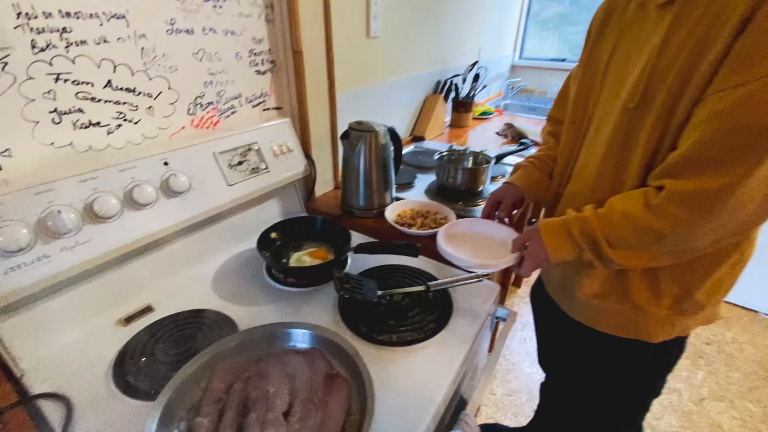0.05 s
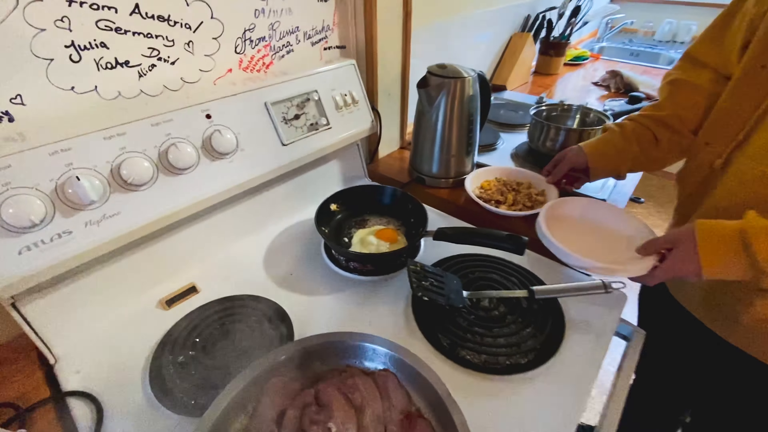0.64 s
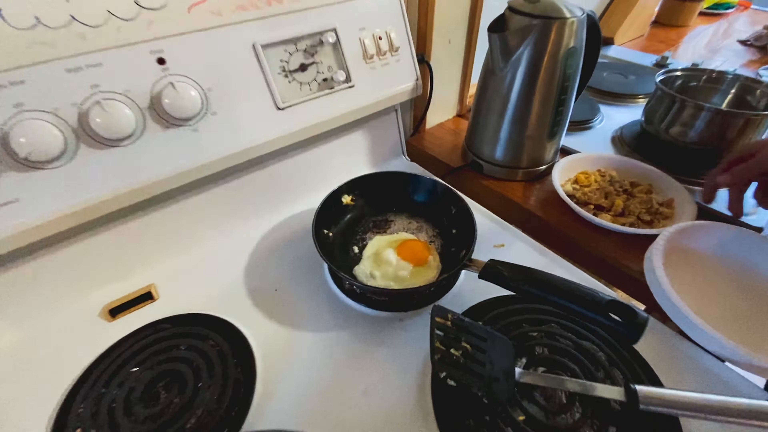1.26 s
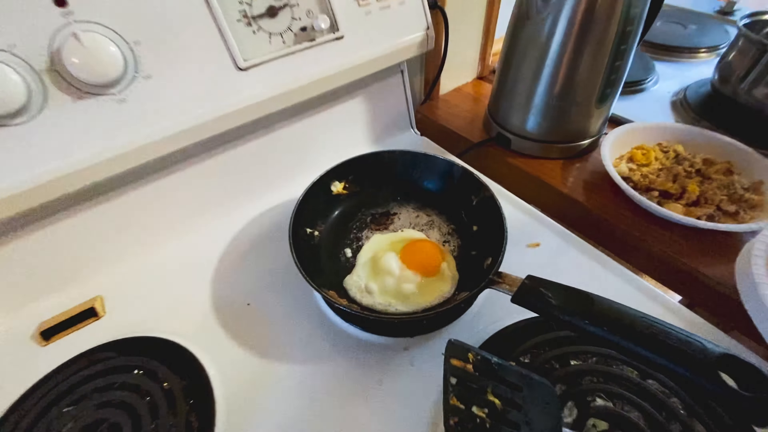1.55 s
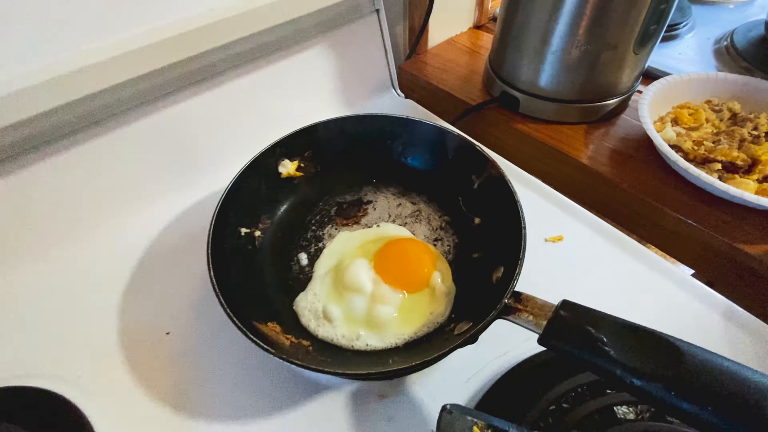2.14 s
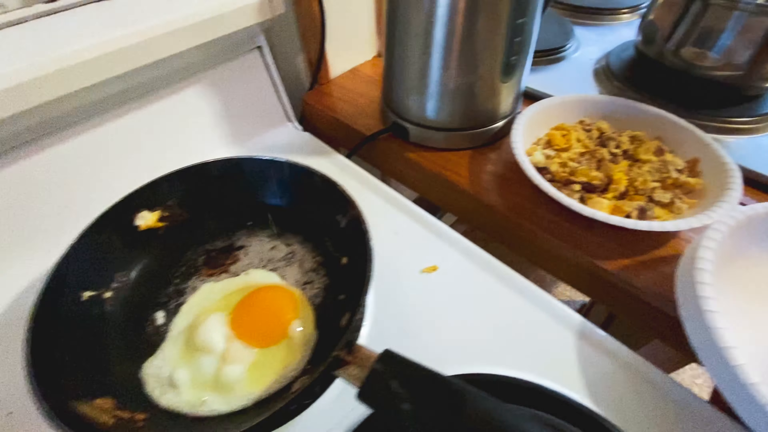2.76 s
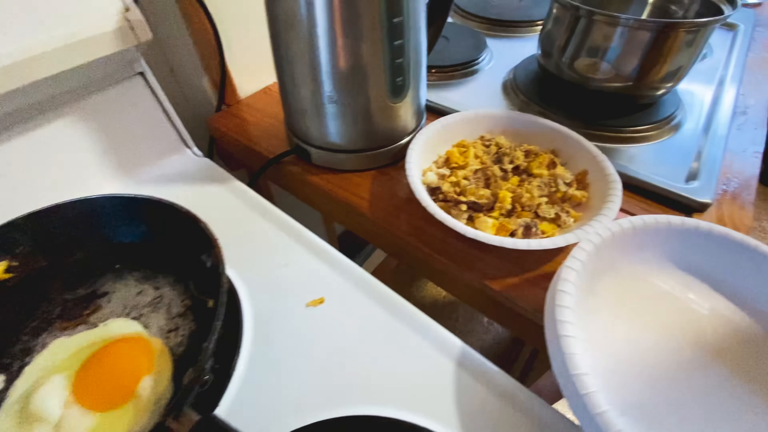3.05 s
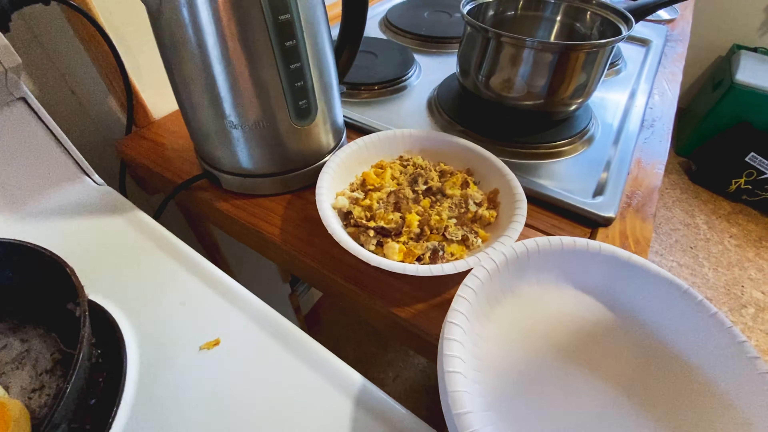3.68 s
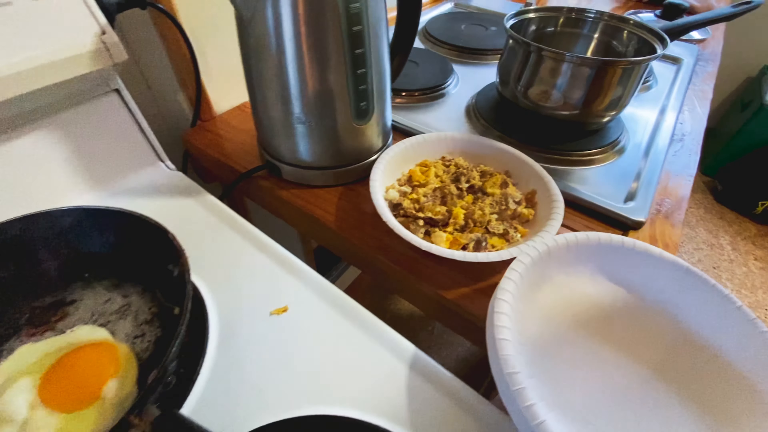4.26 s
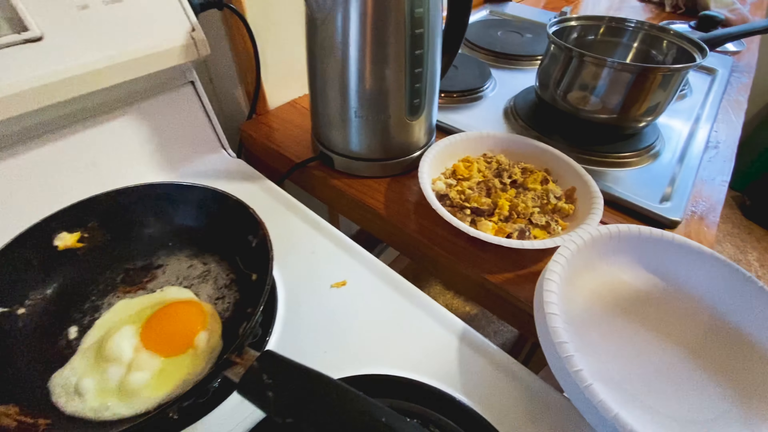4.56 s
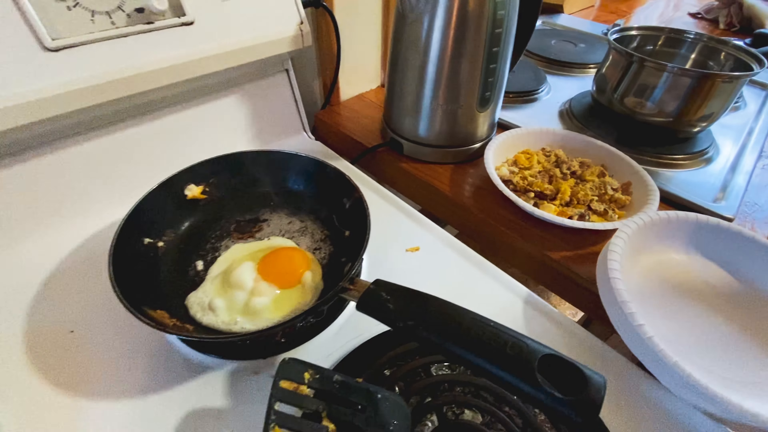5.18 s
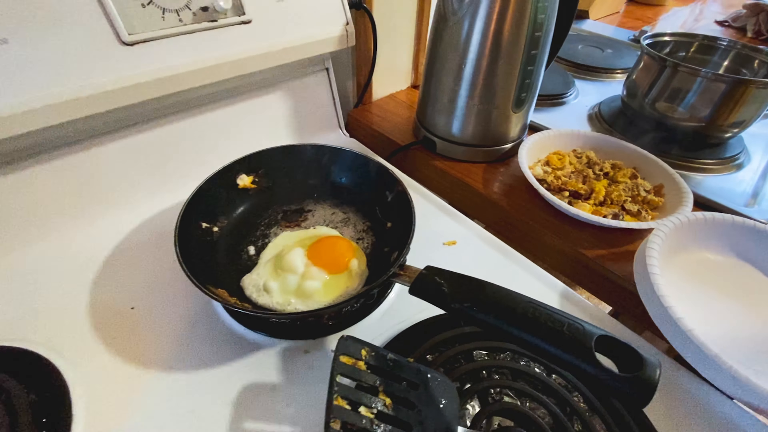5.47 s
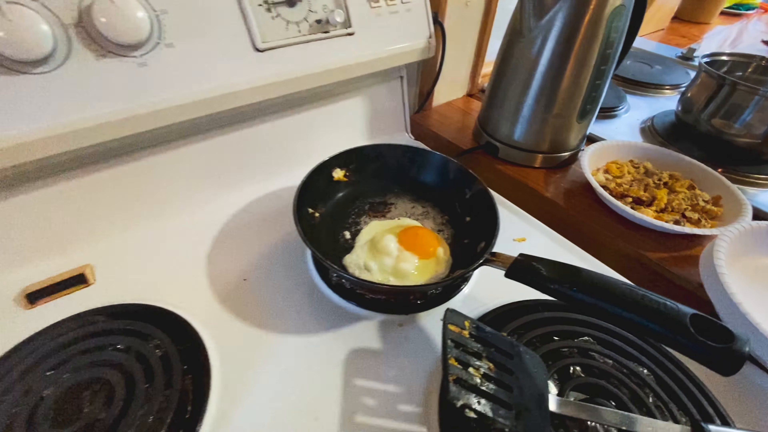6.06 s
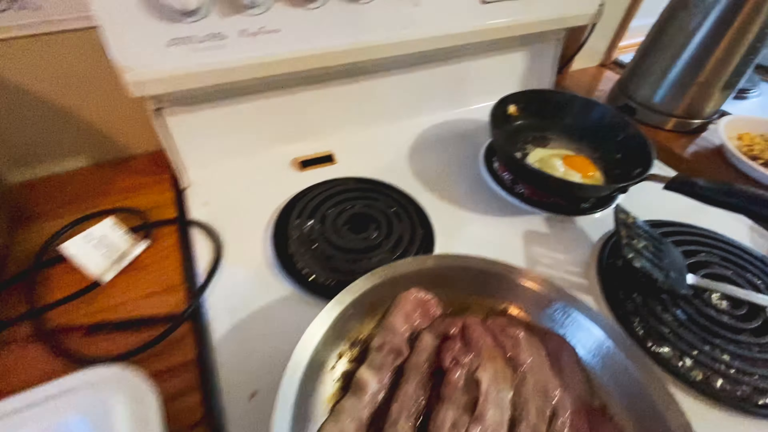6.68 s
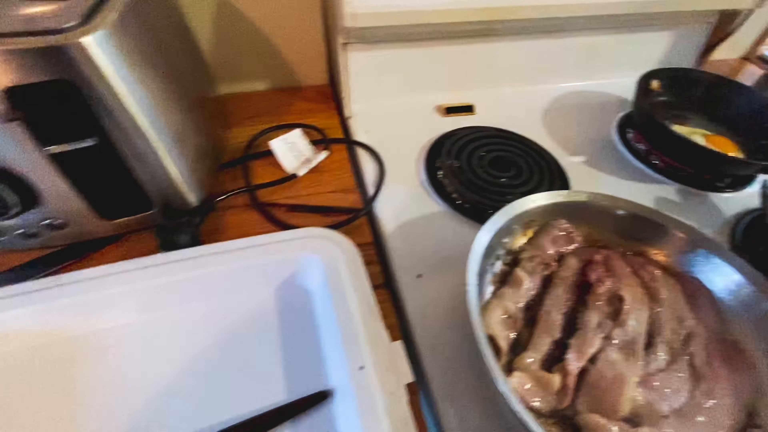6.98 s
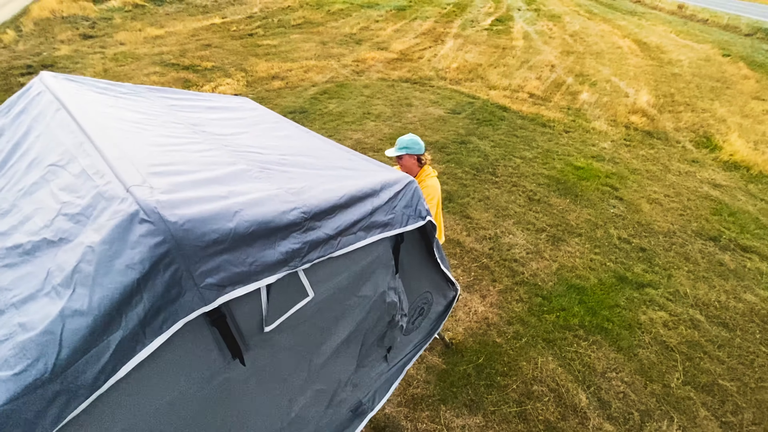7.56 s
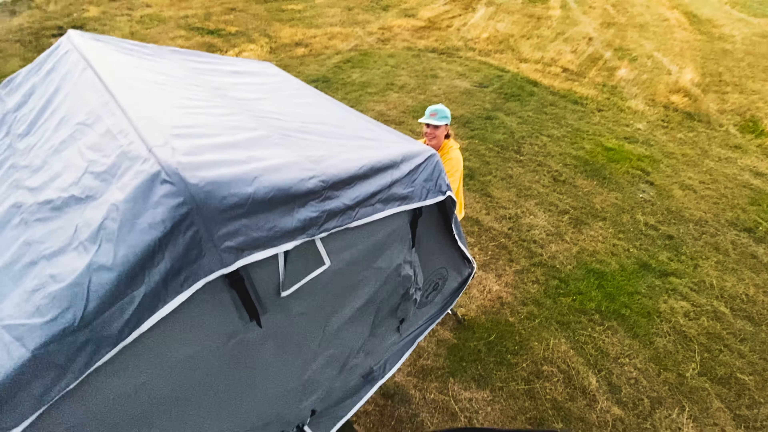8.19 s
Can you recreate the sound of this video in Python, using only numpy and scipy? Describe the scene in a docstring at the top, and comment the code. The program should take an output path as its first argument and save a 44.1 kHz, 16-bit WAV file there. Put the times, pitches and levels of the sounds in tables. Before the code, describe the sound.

Hot fat sizzles and crackles near the microphone in a kitchen as an egg and meat fry. Louder pops and short fizzes break through, with occasional light knocks on the stove and a low hum underneath. Near the end the frying stops abruptly, giving way to quiet open air at a campsite: a light breeze and distant rush, faintly stirring tent cloth, a small metal clink and a few soft bumps.

```python
"""Frying egg, then a campsite.

An egg and a pan of meat fry on an electric stove: steam bubbles burst in the fat, with louder pops,
spurts, passing fizzes and light knocks over a low beating hum. The colour follows where the listener
faces. Cut to a quiet campsite: a breeze, a far rush, a clink, tent cloth rustling and bumping."""
import sys
import numpy as np
from scipy import signal
from scipy.fft import rfft, irfft, next_fast_len
from scipy.io import wavfile
from scipy.ndimage import uniform_filter1d, map_coordinates

SR = 44100
rng = np.random.default_rng(int(sys.argv[2]) if len(sys.argv) > 2 else 0)


def waveform_to_disk(signal):
    """Save audio, clipped to [-1, 1], as 16-bit WAV at the path in sys.argv[1]."""
    frames = np.transpose(np.atleast_2d(signal))
    scaled = np.clip(frames, -1, 1) * 32767
    samples = np.round(scaled).astype(np.int16)
    wavfile.write(sys.argv[1], SR, samples)


N = 367234
T = np.arange(N) / SR
CUT_S = 7.196
EGG_LEAD_MS, MEAT_LEAD_MS = .26, -.186   # left ear's lead: egg left, meat right

# Still kitchen air. Each row: frequency in Hz, relative density in dB.
KITCHEN_AIR = [(25, -36), (50, -12), (130, 0.5), (250, -25.5), (600, -17.5), (2000, -24.5)]
# Breeze and far rush. Each row: frequency in Hz, relative density in dB.
BREEZE_SPECTRUM = [(18, -41), (30, -22), (81, -4), (143, -16.5), (288, -16), (472, -21), (597, -11),
                   (662, -12), (815, -7.5), (905, -14), (978, -9.5), (1270, -23.5), (1970, -29.5),
                   (4310, -58), (8000, -59), (15000, -62.5)]
# Breeze strength. Each row: time in seconds, relative level in dB.
BREEZE_LEVEL = [(7.25, -49.5), (7.876, -49), (8.327, -45.5)]
# Breeze width. Each row: frequency in Hz, left-right correlation.
BREEZE_LIKENESS = [(150, 0.96), (400, 0.67), (1000, 0.56), (6000, 0.23)]
# Stirring tent cloth. Each row: time in seconds, level in dB.
RUSTLE_LEVEL = [(7.25, -74), (7.55, -77), (7.68, -71), (7.75, -63.5), (7.8, -70), (7.89, -83),
                (7.97, -67.5), (8.03, -75), (8.2, -64), (8.27, -79.5)]
# Motor and mains tones. Each row: frequency in Hz, rms in dB before nearness.
HUM_TONES = [(48.88, -69), (97.74, -56), (99.96, -58), (195.5, -74), (199.9, -75)]
# Nearness of the hum. Each row: time in seconds, gain in dB.
HUM_NEARNESS = [(0, -13.5), (.7, -5), (1.5, -2), (3.5, -0.5), (5.5, -1.5), (6.3, -2.5), (6.7, -9.5),
                (7.2, -12.5)]
# Soft low rumbles. Each row: centre in seconds, half-width in seconds, level in dB, pitch in Hz.
RUMBLES = [(0.786, 0.018, -49.5, 180), (0.842, 0.03, -45.5, 85), (6.101, 0.24, -60.5, 420)]
# Knocks of handling, spatula and plate. Each row: start in seconds, thud in dB, its nominal pitch in Hz, clack
# in dB, its pitch in Hz, rattle in dB.
KITCHEN_KNOCKS = [(.772, -31, 179, -25.5, 1500, -36), (2.301, -25.5, 259, -37.5, 1530, -23.5),
                  (2.768, -36.5, 268, -11.5, 1050, -36.5), (2.7695, -17, 215, -29, 420, -44.5),
                  (3.4, -32, 330, -29, 790, -25.5), (3.4, -45, 300, -19.5, 2370, -34),
                  (4.441, -37.5, 218, -37, 680, -29.5), (4.8686, -22.5, 352, -19, 680, -23),
                  (4.8686, -52.5, 300, -8, 2300, -14), (4.8728, -30.5, 300, -9.5, 2560, -32),
                  (4.878, -30, 170, -10.5, 2470, -22), (7.04, -33.5, 362, -25, 1110, -27)]
# Tent cloth bumps and snaps. Each row: as for the kitchen knocks.
TENT_BUMPS = [(8.074, -59, 150, -56, 2000, -42), (8.092, -51, 181, -27, 750, -30.5),
              (8.0955, -21.5, 120, -48, 714, -36), (8.116, -35, 130, -23.5, 850, -23.5),
              (8.116, -57, 300, -37, 8500, -22), (8.116, -60, 301, -22.5, 1930, -41),
              (8.212, -29, 168, -58, 750, -58)]
# Listener's heading. Each row: time in seconds, aim (-1 meat, 0 egg, 1 the plate past it).
AIM = [(0, -0.61), (.7, -0.27), (1.2, -0.14), (2.65, 0.78), (2.95, 0.99), (4.3, 1), (5.2, 0.85),
       (6.3, -0.037), (6.8, -0.916)]
# Frying colour per heading. Each row: frequency in Hz, left gain in dB, right gain in dB.
FACING_MEAT = [(230, -47, -34.5), (442, -24, -21), (803, -17, -9), (1240, -11.5, -5), (1600, -8, -12.5),
               (2076, -13, -8), (2900, -3.5, -10), (4850, -2, -1.5), (5940, -2.5, -9), (7300, -4, -6),
               (8830, -17.5, -6.5), (11300, -5.5, -6), (13300, -15, -15), (14800, -10.5, -10.5)]
FACING_EGG = [(230, -25.5, -29.5), (472, -16.5, -21.5), (890, -1.5, -13), (1267, -3, -8.5), (1500, 2, -3),
              (1950, 1.5, -1), (3640, -3, -7.5), (5100, -4, -6), (6650, -0.5, -10.5), (8780, -7, -5),
              (11180, -7.5, -6), (13150, -11.5, -12), (14600, -11, -10.5)]
FACING_PLATE = [(232, -31, -36), (503, -21.5, -28.5), (640, -12.5, -17.5), (1320, -11, -17.5),
                (1620, -10, -9.5), (1900, -10.5, -13), (2860, -3.5, -8), (4200, -9.5, -13.5),
                (6170, -4, -16.5), (8360, -16, -10.5), (12420, -17.5, -19), (14000, -18.5, -18.5),
                (15500, -17.5, -18)]
# Sizzle scattered by the kitchen. Each row: frequency in Hz, level in dB re direct sound.
SCATTER = [(300, 6.5), (1000, -5), (2500, -4), (5000, -0.5), (9000, -1.5), (12000, -1)]
# How hard the fat fries. Each row: time in seconds, gain in dB.
VIGOUR = [(0, -3), (.2, -2), (.42, 0.5), (.85, 1), (1.25, 0), (1.55, 1), (2.1, 0.6), (2.6, 3), (3.7, 0.5),
          (5, 4.5), (5.75, 2), (6.45, 1.5), (6.8, 1), (7.19, -2)]
# Large, low bubbles. Each row: time in seconds, gain in dB.
LARGE_BUBBLES = [(0, -1), (.35, -2.5), (.6, 0), (.9, -1.5), (1.5, 1), (2.2, -1.5), (2.6, -2.5), (3.5, 3.5),
                 (4.5, -1.5), (5.1, -0.5), (6.0, -1), (6.6, 0), (7.1, 0)]
# The two pans. Each row: frequency in Hz, meat re egg in dB, lean of each to its side in dB.
PAN_BALANCE = [(1000, -9, 3), (1960, -8, 10.5), (3480, -6, 33.5), (6000, -13.5, 17), (9040, 2, 8.5),
               (12000, 2.5, 1.5)]
# The egg throws larger droplets, the meat finer. Each row: pitch in Hz, left ear's lead in ms.
DROPLET_LEAD = [(6500, EGG_LEAD_MS), (8500, MEAT_LEAD_MS)]
# Droplet side. Each row: pitch in Hz, left over right in dB.
DROPLET_SIDE = [(2200, 2), (3600, 21), (5500, 18), (7000, 1), (8000, -5), (12000, -1.5)]
# Steam leaks under the egg. Each row: centre in seconds, half-width in seconds, level in dB,
# pitch in Hz, bandwidth in octaves.
FIZZES = [(.42, .18, -29.5, 4730, .25), (0.796, .08, -31.5, 4520, .26), (1.774, 0.084, -26.5, 6100, 0.22),
          (2.494, 0.39, -32, 4900, 0.34)]
# Steam jets. Each row: start in seconds, half-length in seconds, level in dB, pitch in Hz,
# left over right in dB.
SPURTS = [(.624, .014, -25, 1550, 2), (0.758, 0.04, -24, 8080, -6), (0.941, 0.02, -25.5, 3880, 0),
          (1.184, .01, -26, 1550, 3.5), (1.52, 0.021, -35, 6770, 0), (3.383, 0.027, -27, 7030, 0),
          (4.437, 0.033, -28, 3670, 11), (5.042, 0.0023, -22, 5240, 5), (6.421, 0.0099, -18.5, 6830, 2),
          (6.425, .006, -20, 1900, 4), (7.12, .03, -29, 2700, -5)]
# Water popping in fat. Each row: start in seconds, level in dB, pitch in Hz, mist in dB re pop.
POPS = [(.062, -9, 4800, -16), (0.1485, -16, 6060, -3), (.202, -10, 5500, -18), (.2077, -10, 5800, -15),
        (0.225, -5, 5040, -21), (.3591, -7, 5340, -15), (0.395, -3, 5500, -16), (0.5024, -6, 11450, -7),
        (0.6695, -4, 5300, -24), (0.761, 3, 7490, -13), (0.7816, 4, 8600, -18), (0.882, -3, 12000, -11),
        (1.107, -7.5, 13000, -8), (1.162, -6.5, 4950, -14), (1.3413, -8, 4370, -19), (1.41, -9, 9200, -13),
        (1.4166, -9, 5540, -8), (1.527, -10, 6000, -6), (1.534, -4, 5670, -14), (1.5735, -3, 5600, -5.5),
        (2.1783, -8, 5840, -18), (2.3155, -9, 4960, -18), (2.3008, -11.5, 6000, -2.5),
        (2.4678, -13.5, 3180, -19), (2.612, -4.5, 5700, -16), (2.653, -7, 4840, -20),
        (2.744, -16, 3200, -20), (2.749, -0.5, 5700, -19), (2.7673, 0.5, 12600, -8.5),
        (2.9994, -13.5, 6870, -18), (3.2139, -15, 5300, -10), (3.2935, -17, 2800, -20),
        (3.8962, -12.5, 5870, -25), (4.4061, -6.5, 5500, -26), (4.44, -7, 2900, -22),
        (4.4426, -10, 5000, -16), (4.444, -13, 4140, -18), (4.4537, -17, 2900, -12),
        (4.7197, -13, 2580, -16.5), (5.0202, -0.5, 4100, -31), (5.0449, -4.5, 5360, -5.5),
        (5.135, -8, 6800, -8), (5.2007, -6.5, 5730, -20), (5.294, -8, 3720, -27), (5.4195, -7, 3560, -17.5),
        (5.5142, -9, 13500, -7), (5.684, -4, 5080, -20), (5.685, -9, 2250, -18), (5.72, -5, 5500, -17),
        (5.812, -8.5, 4550, -21), (5.87, -10, 5600, -9), (6.0368, 0, 8700, -11), (6.194, -8, 1730, -23),
        (6.28, -6, 7020, -18), (6.407, -0.5, 7060, -19), (6.418, -5, 6980, -20), (6.4246, 3, 6700, -19),
        (6.4422, 4, 6530, -15), (6.4512, 1, 5100, -25), (6.701, -2, 9700, -17), (6.9958, -8, 6770, -21),
        (7.1311, -9.5, 3950, -23), (7.167, -6, 4850, -18)]


def from_db(db):
    """Decibels to gain."""
    return np.exp(np.asarray(db) * (np.log(10) / 20))


def unit_rms(x):
    """Scale to rms 1."""
    return x / np.sqrt(np.mean(x ** 2) + 1e-20)


def in_time(curve):
    """A curve's value at every sample."""
    return np.interp(T, *np.transpose(curve))


def at_hz(table, hz, column=1):
    """Interpolate a column over log frequency."""
    table = np.array(table)
    return np.interp(np.log(hz), np.log(table[:, 0]), table[:, column])


def band(x, hz, octaves):
    """Band-pass around a pitch."""
    edges_hz = np.clip(hz * 2 ** (np.array([-.5, .5]) * octaves), 10, [.4 * SR, .47 * SR])
    return signal.sosfilt(signal.butter(2, edges_hz, "band", fs=SR, output="sos"), x + 1e-18)


def coloured(x, spectrum, column=1):
    """Filter by one column of a spectrum."""
    size = next_fast_len(N)
    hz = np.fft.rfftfreq(size, 1 / SR) + 1
    return irfft(rfft(x, size) * from_db(at_hz(spectrum, hz, column)), size)[..., :N]


def drift(rate_hz):
    """Slow random wander, rms about 1."""
    pole = np.exp(-80 * np.pi * rate_hz / SR)
    noise = rng.standard_normal(N // 40 + 2002)
    slow = signal.lfilter([1], [1, -2 * pole, pole * pole], noise)[2000:]
    return np.interp(np.arange(N) / 40, np.arange(len(slow)), unit_rms(slow))


def decay(t, t60_s):
    """Exponential decay."""
    return from_db(-60 * t / t60_s)


def bursts(per_s, spread_db, limit_db):
    """Random clicks, most tiny, a few large; rms 1."""
    at = np.flatnonzero(rng.random(N) < per_s / SR)
    size_db = np.minimum(spread_db * rng.exponential(1, len(at)), limit_db)
    clicks = np.zeros(N)
    clicks[at] = from_db(size_db) * rng.choice([-1, 1], len(at))
    return unit_rms(clicks)


def ping(hz, cycles, glide):
    """A tone swells for the given cycles, then dies; glide raises its pitch."""
    age = T[:SR // 50] * hz / cycles
    envelope = (age * np.exp(1 - age)) ** 2
    return envelope * np.sin(2 * np.pi * cycles * age * (1 + glide * age / (1 + age)))


def panned(x, pan_db):
    """Split to stereo; positive is left."""
    return x * from_db(np.array([[.5], [-.5]]) * pan_db)


def ears(x, lead_ms):
    """Delay the right ear against the left."""
    left, right = np.broadcast_to(x, (2, x.shape[-1]))
    late = np.arange(len(right)) - lead_ms * SR / 1000
    return np.array([left, map_coordinates(right, [late], order=3)])


def placed(x, hz):
    """Place a droplet by pitch; the nearer ear gets full level."""
    pan_db = at_hz(DROPLET_SIDE, hz)
    return panned(ears(x, at_hz(DROPLET_LEAD, hz)), pan_db) * from_db(-abs(pan_db) / 2)


def add(out, start_s, x):
    """Mix in a short sound."""
    i = int(start_s * SR)
    out[:, i:i + x.shape[-1]] += x[..., :N - i]


def air(spectrum, likeness):
    """Air as smooth, coloured stereo noise; rms 1."""
    size = next_fast_len(N)
    hz = np.fft.rfftfreq(size, 1 / SR) + 1
    mid, side = rfft(rng.standard_normal((2, size))) * from_db(at_hz(spectrum, hz))
    alike = np.clip(at_hz(likeness, hz), -1, 1)
    stereo = np.sqrt(1 + alike) * mid + np.sqrt(1 - alike) * side * [[1], [-1]]
    return unit_rms(irfft(stereo)[:, :N])


def hum(beat_peak_s=3.44):
    """Motor and mains tones beat about twice a second."""
    t = T - beat_peak_s
    tones = sum(from_db(db) * np.sqrt(2) * np.cos(2 * np.pi * hz * t) for hz, db in HUM_TONES)
    return from_db(in_time(HUM_NEARNESS)) * tones


def rustle(hz=2250, octaves=0.9, per_s=350, flutter_db=1.5):
    """Creases crinkle faintly as the tent cloth stirs."""
    creases = np.array([band(bursts(per_s, 2.1, 13), hz, octaves) for ear in range(2)])
    return unit_rms(creases) * from_db(in_time(RUSTLE_LEVEL) + flutter_db * drift(14.5))


def clink(start_s=7.802, ring_db=-53, ring_hz=2640, click_db=-58, click_hz=6500):
    """A small metal piece on the tent ticks and rings."""
    out, t = np.zeros((2, N)), T[:SR // 5]
    click = unit_rms(band(rng.standard_normal(len(t)), click_hz, 2.2)) * decay(t, t60_s=0.053)
    ring = np.sin(2 * np.pi * ring_hz * t) * decay(t, t60_s=0.074)
    add(out, start_s, from_db(ring_db) * ring + from_db(click_db) * click)
    return out


def rumbles(octaves=1.06):
    """Soft low rumbles: two brief bumps, then a longer low swell of the frying."""
    out = np.zeros((2, N))
    for centre_s, half_s, db, hz in RUMBLES:
        offset = T[:int(6 * half_s * SR)] / half_s - 3
        noise = unit_rms(band(rng.standard_normal(len(offset)), hz, octaves))
        add(out, centre_s - 3 * half_s, from_db(db - 2.16 * offset ** 2) * noise)
    return out


def knocks(rows, clack_cycles, rattle_octaves, rattle_t60_s, ring_db, pan_db, thud_cycles=5.2):
    """Each contact gives a damped thud, a dry clack, a short rattle and a faint ring."""
    out, t = np.zeros((2, N)), T[:SR // 5]
    for start_s, thud_db, thud_hz, clack_db, clack_hz, rattle_db in rows:
        thud_t60_s = thud_cycles / thud_hz
        sinking_hz = thud_hz * (0.61 + 0.87 * decay(t, 1.5 * thud_t60_s))   # the contact relaxes
        thud = from_db(thud_db) * np.sin(2 * np.pi * np.cumsum(sinking_hz) / SR) * decay(t, thud_t60_s)
        rattle = band(rng.standard_normal(len(t)), clack_hz, rattle_octaves) * decay(t, rattle_t60_s)
        rattle *= from_db(rattle_db) / np.abs(rattle).max()
        ring = from_db(clack_db + ring_db) * np.sin(2 * np.pi * clack_hz * t) * decay(t, t60_s=0.08)
        clack = from_db(clack_db - pan_db / 2) * ping(clack_hz, clack_cycles, glide=0)
        add(out, start_s, thud + panned(rattle + ring, pan_db))
        add(out, start_s, panned(clack, pan_db))
    return out


def kitchen_reverb(x, t60_s=0.056, wet_db=-5.5, cutoff_hz=11400):
    """Close walls and worktops scatter a short, dull tail that keeps changing."""
    t, hop = T[:SR // 4], SR // 4
    out, lowpass = x.copy(), signal.butter(1, cutoff_hz, fs=SR)
    for i in range(0, N, hop):
        piece = x[:, i:i + 2 * hop]
        piece = piece * np.sin(np.pi * np.arange(piece.shape[1]) / (2 * hop))
        tail = rng.standard_normal((2, len(t))) * decay(t, t60_s) * (t > .001)
        tail = signal.lfilter(*lowpass, tail / np.sqrt(np.sum(tail ** 2) / 2))
        add(out, i / SR, from_db(wet_db) * signal.fftconvolve(piece, tail, axes=1))
    return out


def stove_echo(x, delay_ms=0.915, sway=0.303, sway_hz=1.236, echo_db=-11):
    """The enamel top mirrors the sound; the path sways, shifting the colour."""
    i = np.arange(N)
    late = [i - delay_ms * SR / 1000 * np.exp(sway * drift(sway_hz)) for ear in x]
    return x + from_db(echo_db) * np.array([np.interp(at, i, ear) for at, ear in zip(late, x)])


def dip(depth_db=7):
    """The level dips briefly."""
    return from_db(-depth_db * np.interp(T, [2.771, 2.778, 2.905, 2.935], [0, 1, 1, 0]))


def fizz(per_s=300, waver=0.031, waver_hz=5, pan_db=7):
    """Each steam leak swells and fades as a stream of like-sized bubbles, wavering in pitch."""
    out = 0
    for centre_s, half_s, db, hz, octaves in FIZZES:
        stream = unit_rms(band(bursts(per_s, spread_db=2.2, limit_db=12.3), hz, octaves))
        stream = map_coordinates(stream, [np.cumsum(1 + waver * drift(waver_hz))], order=3)
        swell = np.exp(-np.minimum(((T - centre_s) / half_s) ** 2, 20))
        out = out + from_db(db) * swell * stream
    return panned(ears(out, EGG_LEAD_MS), pan_db) * from_db(-pan_db / 2)


def spurts(octaves=1.16, rough_db=3, fade_db=7):
    """Trapped steam escapes in a ragged, fading jet."""
    out = np.zeros((2, N))
    for start_s, half_s, db, hz, pan_db in SPURTS:
        age = T[:int(2 * half_s * SR)] / half_s
        ragged = from_db(rough_db * unit_rms(uniform_filter1d(rng.standard_normal(len(age)), size=60)))
        jet = unit_rms(band(rng.standard_normal(len(age)) * ragged, hz, octaves))
        jet *= from_db(db - fade_db * age ** 2)
        add(out, start_s, panned(ears(jet, at_hz(DROPLET_LEAD, hz)), pan_db))
    return out


def spits(count, level_db, pitch_hz, octaves, cycles, away_db, spread_db=2.2):
    """Small pops at random times, weaker as the listener turns from the egg."""
    out, aim = np.zeros((2, N)), in_time(AIM)
    starts_s = rng.uniform(0, CUT_S, count)
    deviations = np.clip(rng.standard_normal((count, 2)), -2, 2)
    for start_s, (size, pitch) in zip(starts_s, deviations):
        hz = pitch_hz * 2 ** (octaves * pitch)
        db = level_db + spread_db * size - away_db * aim[int(start_s * SR)] ** 2
        add(out, start_s, from_db(db) * placed(ping(hz, cycles, glide=0.1), hz))
    return out


def pops(mist_hz=9000, mist_octaves=2.4, mist_s=0.0008):
    """A bright mist of fat swells and dies; at its height the droplet bursts with a ping."""
    out, t = np.zeros((2, N)), T[:SR // 100]
    swell = np.exp(-(t / mist_s - 2) ** 2)
    for start_s, db, hz, mist_db in POPS:
        mist = unit_rms(band(rng.standard_normal(len(t)), mist_hz, mist_octaves)) * swell
        mist = panned(ears(mist, MEAT_LEAD_MS), pan_db=-1)
        add(out, start_s - 2 * mist_s, from_db(db + mist_db) * mist)
        add(out, start_s, from_db(db) * placed(ping(hz, cycles=1.6, glide=0.04), hz))
    return out


def bubbles(per_s=1200, snaps_per_s=2600, snap_db=-1.5, flicker_db=1.0):
    """In each pan bubbles ring at a pitch set by size; tearing films snap at all pitches. Rms 1."""
    lead_scale = np.interp(in_time(AIM), [-1, -.55, 0], [-.6, .8, 1])
    out = 0
    for pan, lead_ms in enumerate((EGG_LEAD_MS, MEAT_LEAD_MS)):
        snaps = from_db(snap_db) * bursts(snaps_per_s, spread_db=4.5, limit_db=17.5)
        fat = 0
        for hz in 14000 / 2 ** (np.arange(13) / 2):
            meat_db, lean_db = at_hz(PAN_BALANCE, hz), at_hz(PAN_BALANCE, hz, column=2)
            shares = panned(1, lean_db), panned(from_db(meat_db), -lean_db)
            clicks = bursts(per_s, spread_db=4.5, limit_db=23) + snaps * rng.standard_normal(N)
            rings = band(clicks, hz, octaves=0.65) * from_db(flicker_db * drift(25))
            fat = fat + shares[pan] / np.hypot(*shares) * rings
        out = out + ears(fat, lead_ms * lead_scale)
    return unit_rms(out)


def sizzle(level_db=-27.5, clump_db=2.0, shade_db=1.0, wander_db=1.7, large_hz=2000, spray_hz=7500):
    """Close bubbles over their smooth scatter, shaded by the pan rims as the listener turns."""
    aim = in_time(AIM)
    direct_gain = from_db(clump_db * drift(44) - shade_db * np.clip(aim, 0, 1) ** 4)
    fat = stove_echo(bubbles() * direct_gain + coloured(rng.standard_normal((2, N)), SCATTER))
    # large bubbles and fine spray each come and go
    for hz, kind, trend_db in (large_hz, "low", in_time(LARGE_BUBBLES)), (spray_hz, "high", 0):
        swing = from_db(trend_db + wander_db * drift(0.66)) - 1
        fat = fat + swing * signal.sosfiltfilt(signal.butter(2, hz, kind, fs=SR, output="sos"), fat)
    out = 0
    for facing, colour in (-1, FACING_MEAT), (0, FACING_EGG), (1, FACING_PLATE):
        share = np.maximum(1 - np.abs(aim - facing), 0)
        out = out + share * np.array([coloured(fat[0], colour, 1), coloured(fat[1], colour, 2)])
    return unit_rms(out) * from_db(in_time(VIGOUR) + level_db)


def scene(air_db=-63, breeze_db=1, linger_db=-25):
    """The stove, then a cut to the campsite, where the hiss lingers for an instant."""
    egg_spits = spits(count=260, level_db=-13.5, pitch_hz=5180, octaves=0.5, cycles=1.26, away_db=6.5)
    meat_spits = spits(count=60, level_db=-13, pitch_hz=11900, octaves=0.14, cycles=1.9, away_db=13)
    frying = sizzle() + egg_spits + meat_spits + kitchen_reverb(pops() + spurts() + fizz())
    contacts = knocks(KITCHEN_KNOCKS, clack_cycles=1.4, rattle_octaves=1.47, rattle_t60_s=0.036,
                      ring_db=-25.5, pan_db=13)
    room = rumbles() + hum() + from_db(air_db) * air(KITCHEN_AIR, likeness=[(80, 0.36), (400, 0.12)])
    indoors = contacts + dip() * (frying + room)
    bumps = knocks(TENT_BUMPS, clack_cycles=1.2, rattle_octaves=1.9, rattle_t60_s=0.023,
                   ring_db=-20, pan_db=5.5)
    tent = bumps + rustle() + clink()
    breeze = from_db(in_time(BREEZE_LEVEL) + breeze_db) * air(BREEZE_SPECTRUM, BREEZE_LIKENESS)
    linger = from_db(linger_db) * decay(np.maximum(T - CUT_S, 0), t60_s=0.16)
    hiss = linger * band(indoors, hz=3000, octaves=2.8)
    return np.where(T < CUT_S, indoors, breeze + tent + hiss)


def record(dry):
    """Cut the deepest bass, round the peaks, cut the top steeply."""
    low_hz, high_hz, ceiling = 40, 15900, .75
    thin = signal.sosfilt(signal.butter(4, low_hz, "high", fs=SR, output="sos"), dry)
    rounded = ceiling * np.tanh(thin / ceiling)
    return signal.sosfilt(signal.ellip(10, .2, 100, high_hz, fs=SR, output="sos"), rounded)


dry = scene()
out = record(dry)
waveform_to_disk(out)
```